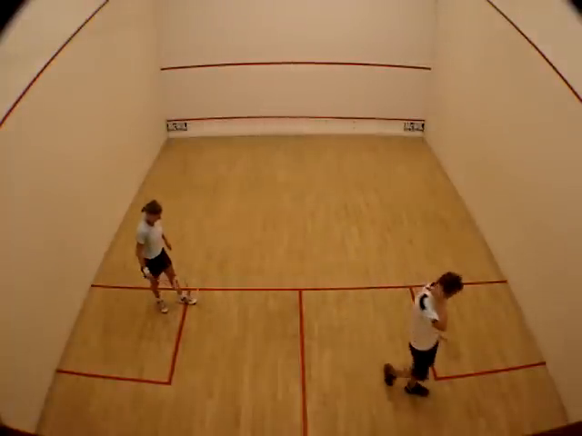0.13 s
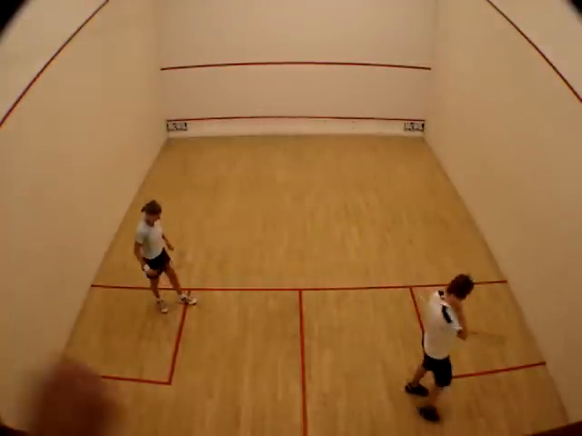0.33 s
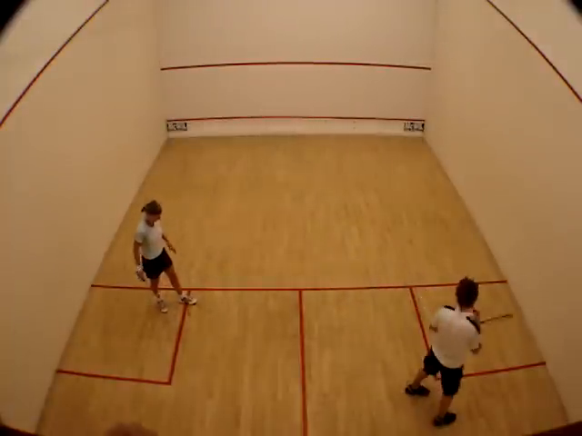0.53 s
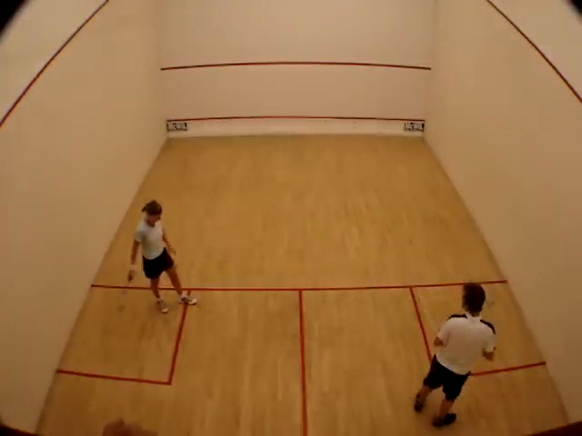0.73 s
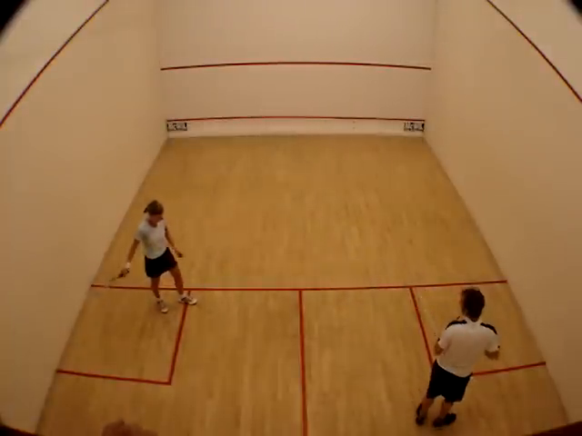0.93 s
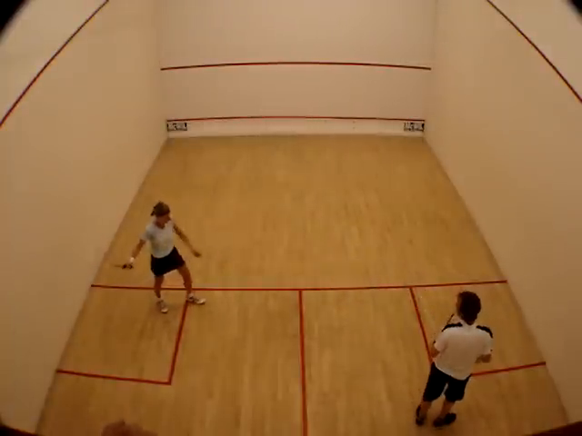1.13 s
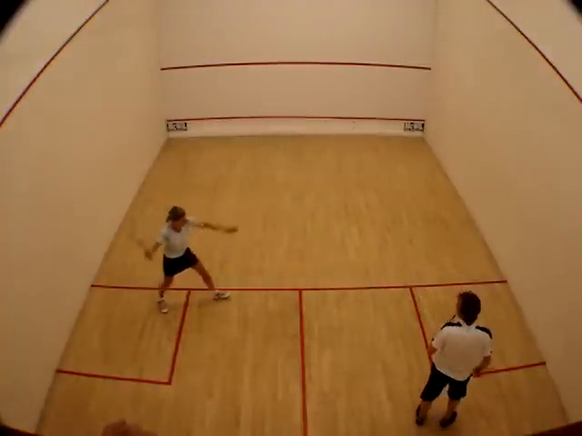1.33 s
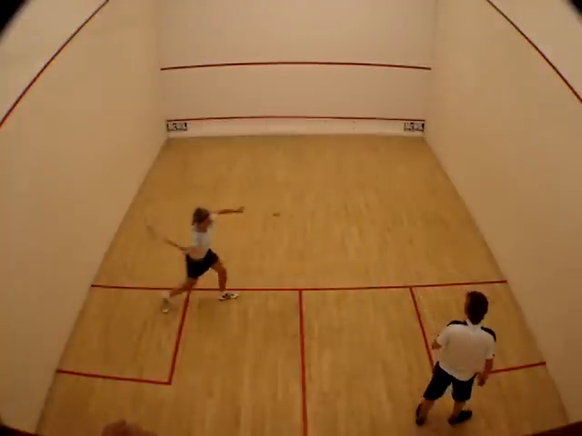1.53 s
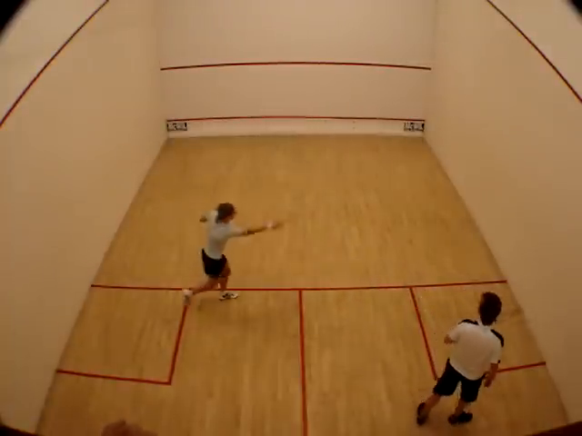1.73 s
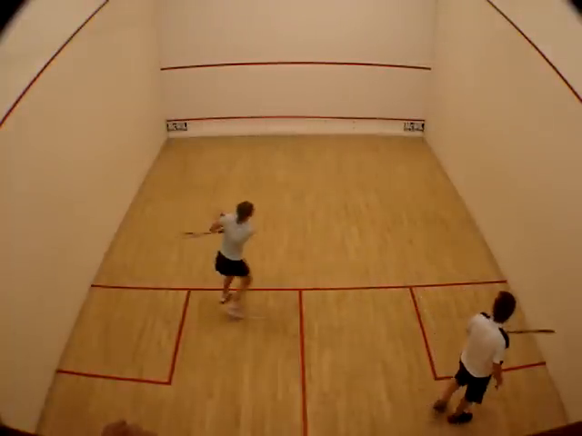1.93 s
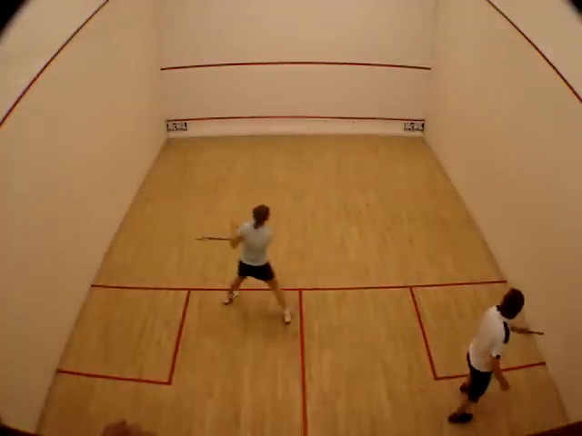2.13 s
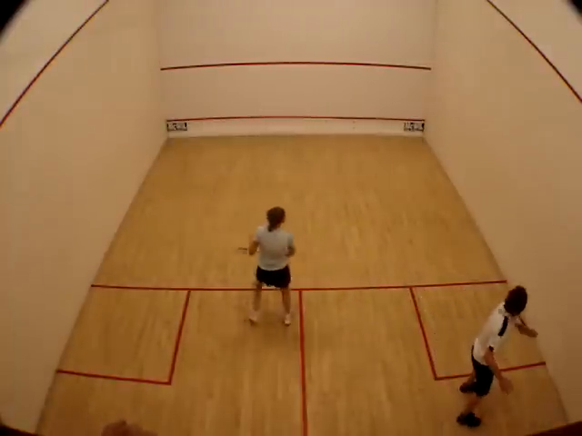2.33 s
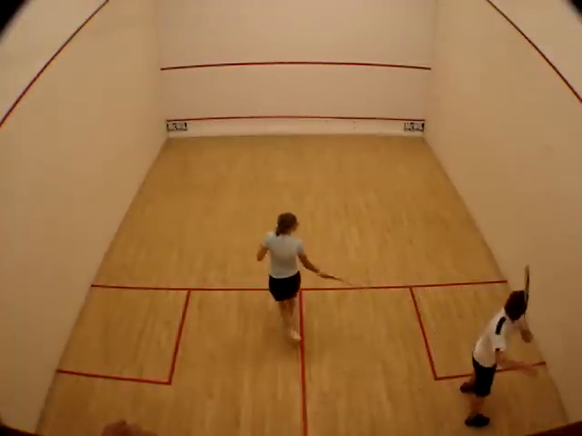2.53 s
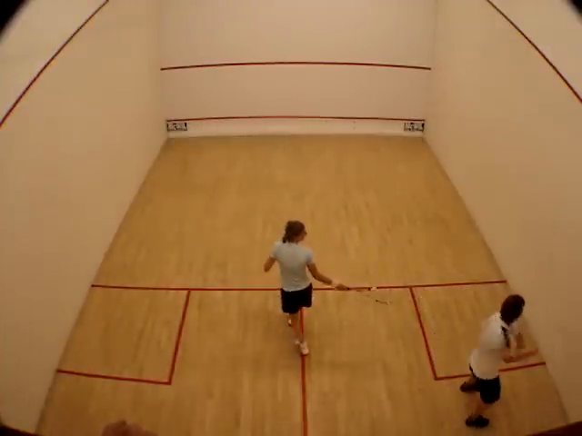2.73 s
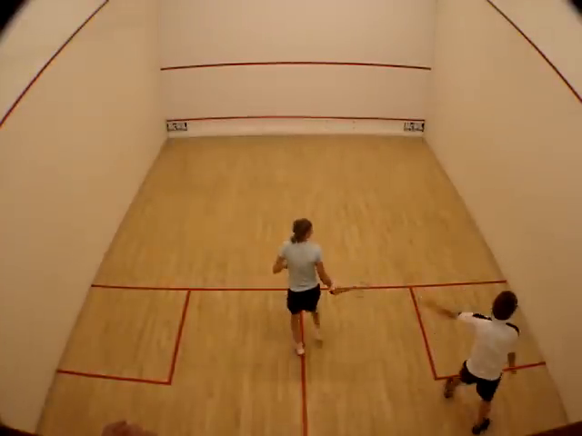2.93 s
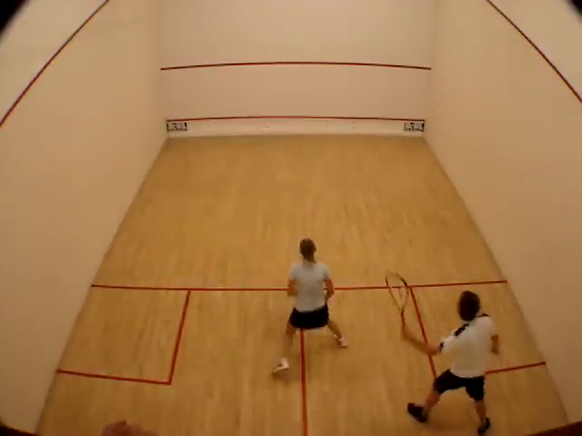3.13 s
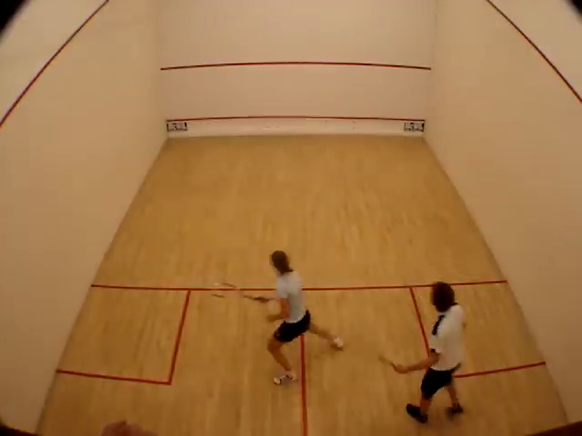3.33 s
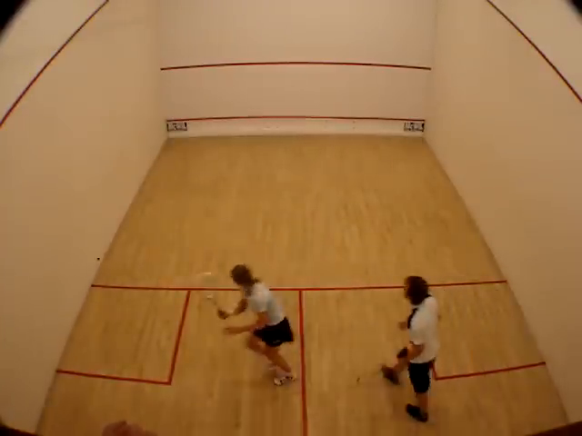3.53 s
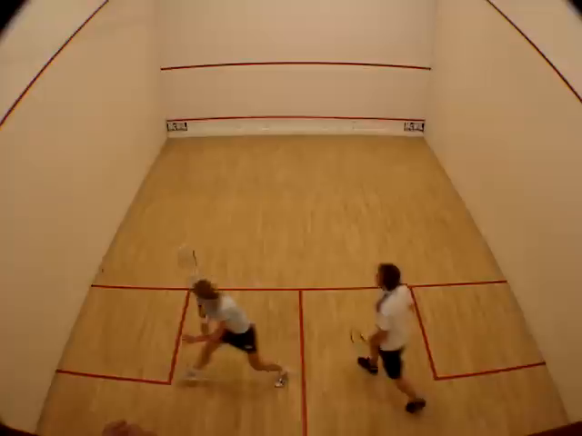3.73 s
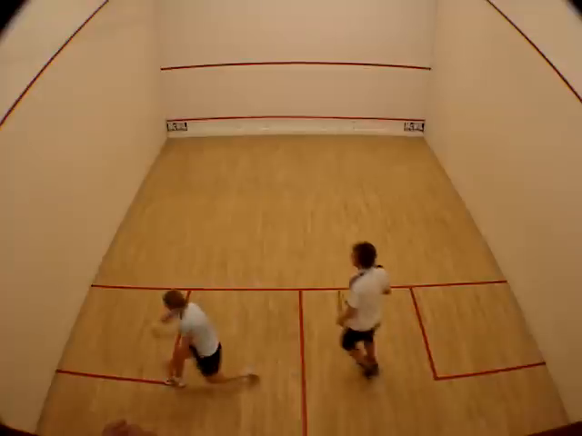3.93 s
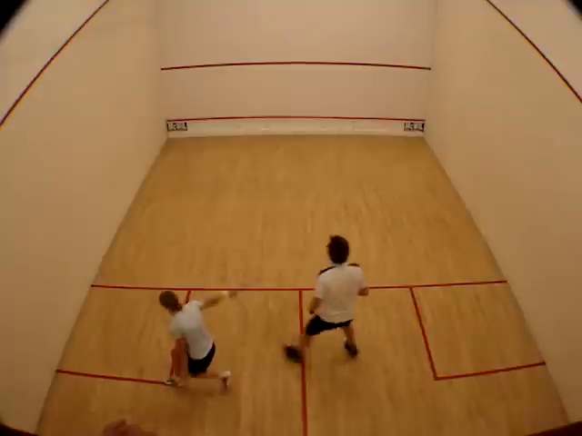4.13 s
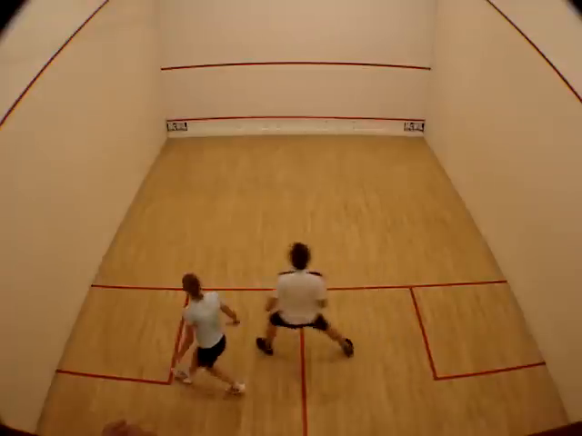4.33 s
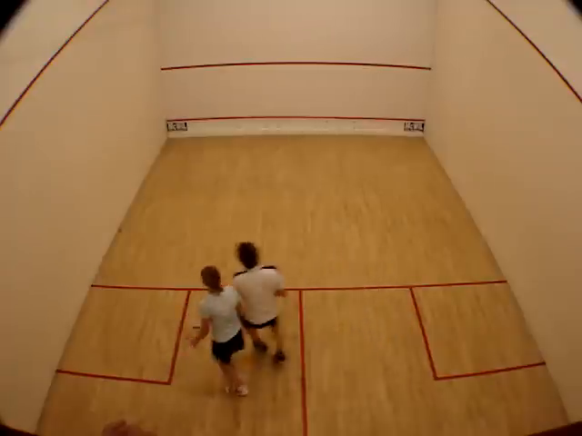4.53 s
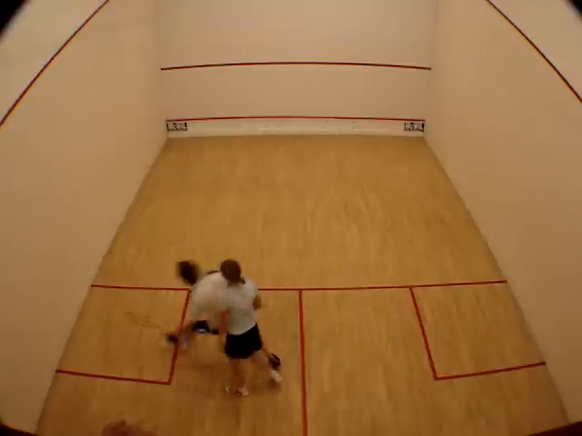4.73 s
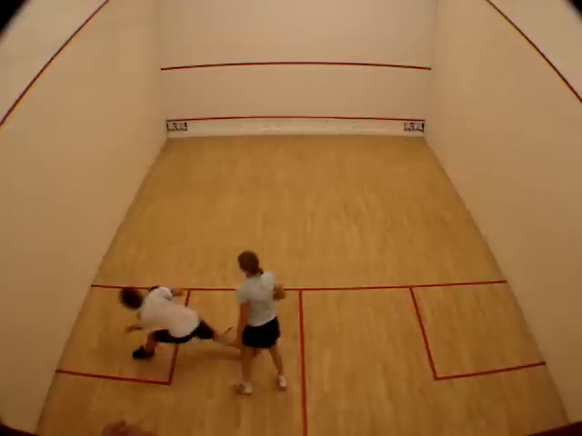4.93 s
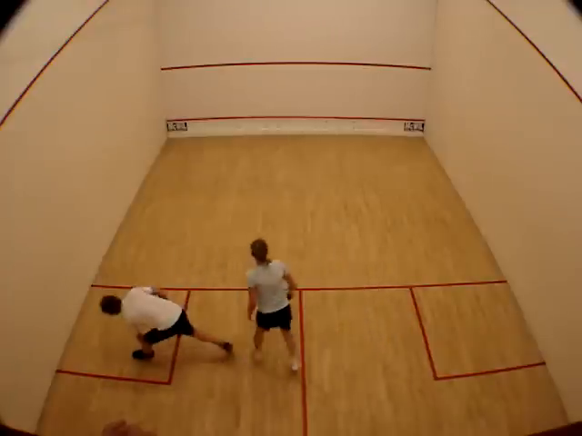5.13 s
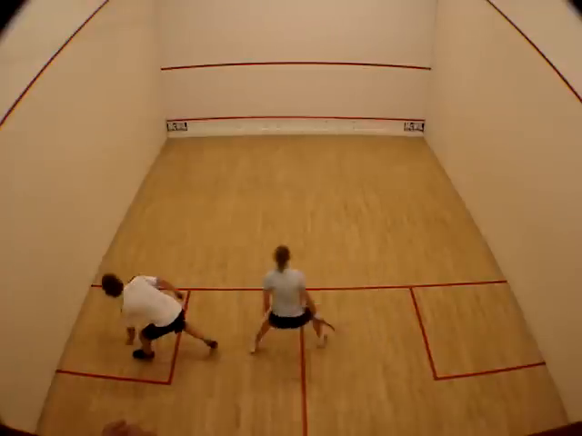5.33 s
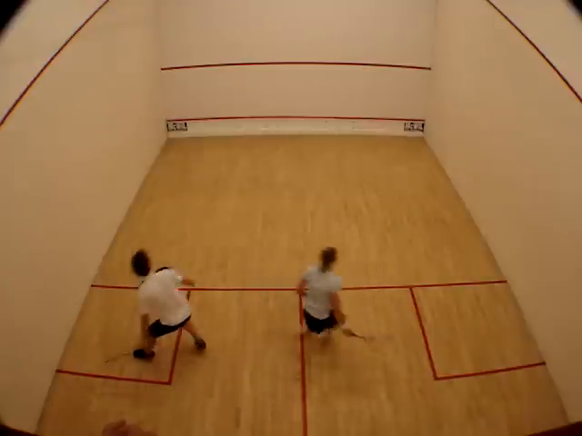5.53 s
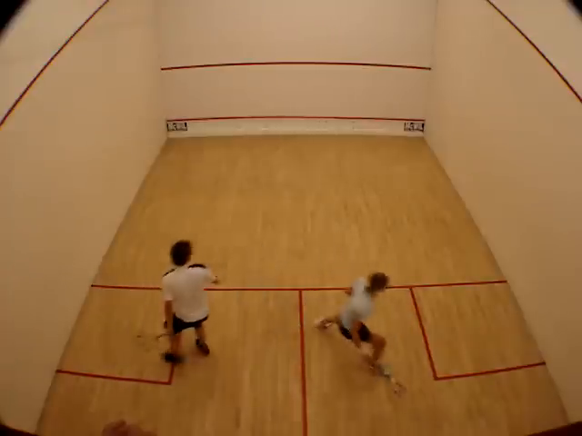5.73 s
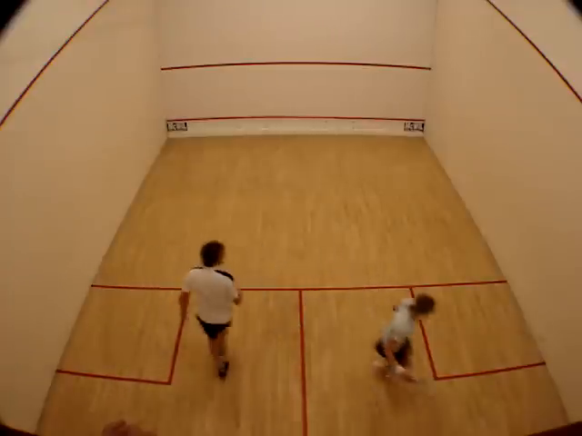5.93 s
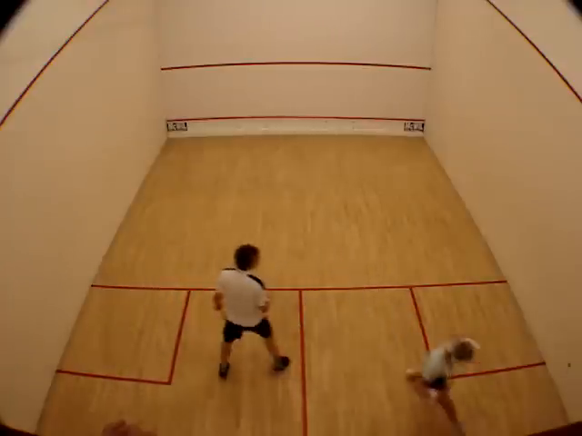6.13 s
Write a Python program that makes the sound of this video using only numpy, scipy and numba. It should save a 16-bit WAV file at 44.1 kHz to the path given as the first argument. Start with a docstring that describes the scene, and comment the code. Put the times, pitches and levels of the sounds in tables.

```python
"""A rubber ball knocks on racket strings and plaster walls in a rally on a bare, very live squash court.
Shoes thud, drag and squeak on the boards, and the court rings on for seconds over the building's murmur.
Short, dull thumps accompany the loudest sounds. A small camera high on the back wall hears it all;
its quick gain control flattens each blow and pulls the ringing back up."""
import sys
import numpy as np
from scipy import signal
from scipy.fft import rfft, irfft
from scipy.io import wavfile
from scipy.ndimage import uniform_filter1d
from numba import njit

SR = 44100
rng = np.random.default_rng(int(sys.argv[2]) if len(sys.argv) > 2 else 0)


def unload_audio(sound):
    """Save the sound as a 16-bit wav file, at the path given as the first command line argument."""
    columns = np.transpose(np.atleast_2d(sound))
    # keep every value between -1 and 1, then stretch to whole-number steps
    steps = np.round(np.clip(columns, -1, 1) * 32767)
    wavfile.write(sys.argv[1], SR, steps.astype(np.int16))


N = 277389


def undb(db):
    """Gain of a level in dB."""
    return 10 ** (np.asarray(db) / 20)


def curve_at(table, hz):
    """Read a curve of (Hz, value) points along a log-frequency axis."""
    freqs, values = np.transpose(table)
    return np.interp(np.log(np.maximum(hz, 1)), np.log(freqs), values)


def add(track, start_s, sound):
    """Mix a sound into the track at its start time."""
    i = max(int(start_s * SR), 0)
    track[i:i + len(sound)] += sound[:len(track) - i]


def knock(colour, pitch, bright_db, tone_hz=1000, tone_db=0, size=2048):
    """One impact: the tightest pulse with this colour, treble tilt and standout tone, at unit energy."""
    hz = np.maximum(np.arange(size // 2 + 1) * SR / size, 30)
    db = curve_at(colour, hz / pitch) + bright_db * np.log2(hz / 1000)
    db += tone_db * np.exp(-.5 * (np.log2(hz / tone_hz) / 0.17) ** 2)  # a bell, 0.17 octaves of spread
    cepstrum = irfft(db * np.log(10) / 20)
    cepstrum[1:size // 2] *= 2  # minimum phase packs the energy into the attack
    cepstrum[size // 2 + 1:] = 0
    pulse = irfft(np.exp(rfft(cepstrum)))
    return pulse / np.sqrt(np.sum(pulse ** 2))


def ball(hits, colour, tone_db, slap_s, slap_db):
    """The ball knocks on a surface, and the facing wall slaps each knock back."""
    knocks = [(start, undb(db) * knock(colour, 0.99, bright_db, tone_hz, tone_db))
              for start, db, bright_db, tone_hz in hits]
    slaps = [(start + slap_s, undb(slap_db) * pulse) for start, pulse in knocks]
    return around_court(knocks) + around_court(slaps)


# Racket strokes. Each row: start in seconds, level in dB, brightness in dB per octave, standout tone in Hz.
RACKET_HITS = [(1.779, -8, 1.36, 404), (2.903, -5, 0.46, 2380), (4.062, -3.5, 1.76, 1860),
               (5.038, -9, -0.8, 2460), (5.18, -6.5, 0.5, 1670)]
# The colour of struck strings. Each row: frequency in Hz, relative level in dB.
STRING_COLOUR = [(60, -38.5), (220, -14), (400, -4.5), (560, -8), (800, 2), (950, -4), (1250, -1),
                 (1600, -8), (2300, -10.5), (2900, -14.5), (3600, -10), (5000, -18.5), (7200, -24),
                 (10000, -36)]


def racket():
    """The strings meet the ball with a hollow, midrange pock."""
    return ball(RACKET_HITS, STRING_COLOUR, tone_db=6.5, slap_s=0.033, slap_db=-4)


# Wall hits. Each row: start in seconds, level in dB, brightness in dB per octave, standout tone in Hz.
WALL_HITS = [(.613, -25.5, 2.1, 3430), (2.001, -3, 0.5, 1204), (3.078, 1.5, 0.75, 1586),
             (3.184, -3.5, 0.22, 860), (4.216, -0.5, 1.1, 793), (4.305, 0.5, .3, 2130),
             (5.227, 0.5, 0.62, 1300)]
# The colour of struck plaster. Each row: frequency in Hz, relative level in dB.
PLASTER_COLOUR = [(60, -50.5), (250, -6), (600, -6), (900, 0.5), (1300, -2.5), (1700, -0.5), (2300, -6),
                  (4100, -11.5), (7000, -21.5), (10000, -25.5)]


def walls():
    """The ball cracks against hard plaster."""
    return ball(WALL_HITS, PLASTER_COLOUR, tone_db=4.5, slap_s=0.049, slap_db=-6.5)


def squeak(length_s, first_hz, last_hz, overtone_db, hiss_db):
    """Stick-slip: a gliding slip rate, overtones from the sharp catch and a rubbing hiss, at unit energy."""
    progress = np.arange(int(length_s * SR)) / (length_s * SR)
    waver, grit = rng.standard_normal((2, 16384))[:, :len(progress)]
    waver = uniform_filter1d(waver, size=6) * np.sqrt(6)
    slip_hz = (first_hz + (last_hz - first_hz) * progress) * (1 + 0.05 * waver)
    phase = 2 * np.pi * np.cumsum(slip_hz) / SR
    tone = np.sin(phase) + undb(overtone_db) * np.sin(2 * phase)
    tone += undb(overtone_db - 16.5) * np.sin(3 * phase)
    hiss = signal.sosfilt(signal.butter(2, (2960, 7000), "band", fs=SR, output="sos"), grit)
    envelope = np.sin(np.pi * progress ** 0.96) ** 0.26
    chirp = (tone + undb(hiss_db) * hiss) * envelope
    return chirp / np.sqrt(np.sum(chirp ** 2))


# Slipping soles. Each row: start and length in seconds, first and last pitch in Hz, level in dB,
# then overtone and hiss in dB against the fundamental.
SQUEAKS = [(0.077, 0.015, 4270, 3950, -30, -8, -6), (0.691, 0.021, 5320, 4370, -24.5, -13, -14),
           (2.165, 0.025, 2720, 2475, -7, -1, -9.5), (2.194, 0.025, 3430, 2970, -9, -18, -5),
           (4.376, 0.023, 3310, 3045, -14.5, -24, -16), (5.43, 0.094, 3924, 4080, -13, -22, -21),
           (5.633, 0.014, 3597, 2880, -3, -11.5, -19), (5.639, 0.019, 3207, 4295, -5, -12, -8.5),
           (6.053, 0.017, 3133, 2724, -2, -10.5, -3.5), (6.066, 0.012, 2230, 2730, -4.5, -8.5, -7),
           (6.08, .015, 2940, 4070, -7, -28, -9)]


def shoe_squeaks():
    """Rubber soles chirp on the varnished boards, now here, now there."""
    chirps = [(start, undb(db) * squeak(length_s, first_hz, last_hz, overtone_db, hiss_db))
              for start, length_s, first_hz, last_hz, db, overtone_db, hiss_db in SQUEAKS]
    return around_court(chirps, decay_scale=0.9)


# Footwork. Each row: start in seconds, level in dB, brightness in dB per octave.
FOOTFALLS = [(.003, -14.5, 1.1), (.1, -21.5, 3), (.218, -19.5, 2), (.29, -10, 2), (.394, -24.5, 3.7),
             (0.611, -15, 2.5), (.684, -20.5, -0.1), (1.497, -14.5, -0.55), (1.702, -32, 1.5),
             (4.919, -24, -0.8), (5.194, -13, 0.6)]
# The colour of the floorboards. Each row: frequency in Hz, relative level in dB.
BOARD_COLOUR = [(50, -30), (105, -15), (140, 0.5), (320, -6.5), (400, -12), (690, -11.5), (1150, -12),
                (1900, -17.5), (3500, -22), (6000, -33.5), (10000, -48.5)]
STEP_DECAY_SCALE = 0.91  # steps ring for this share of the court's decay time


def footsteps():
    """Shoes thud on the boards; the lighter the step, the higher it sounds."""
    firm_db, octaves_per_db = -12, 0.07
    steps = []
    for start, db, bright_db in FOOTFALLS:
        pitch = 2 ** (octaves_per_db * (firm_db - db))
        steps.append((start, undb(db) * knock(BOARD_COLOUR, pitch, bright_db)))
    return around_court(steps, STEP_DECAY_SCALE)


def sole_drag(start_s=1.01, length_s=0.27):
    """A dragged sole: dense grit swells and fades, coloured by the boards and a rough squeal."""
    progress = np.arange(int(length_s * SR)) / (length_s * SR)
    grit = rng.standard_normal(SR)[:len(progress)] * np.sin(np.pi * progress) * np.sqrt(2 / len(progress))
    boards = knock(BOARD_COLOUR, pitch=1.7, bright_db=2.5, tone_hz=3700, tone_db=9)
    track = np.zeros(N)
    add(track, start_s, undb(-22) * signal.fftconvolve(grit, boards))
    return court(track, STEP_DECAY_SCALE)


# Low thumps just ahead of hard ball hits and along with the loudest squeaks.
# Each row: start in seconds, peak level in dB.
THUMPS = [(1.774, -39), (1.992, -23.5), (3.068, -18.5), (4.213, -19.5), (5.221, -16), (5.65, -23),
          (6.058, -23), (6.11, -27)]


def thumps(width_s=0.033):
    """Short, dull low thumps that do not ring on accompany the loudest sounds."""
    widths = np.arange(SR // 10) / (width_s * SR)
    dip = -np.e * 4 * widths * np.exp(-4 * widths)
    track = np.zeros(N)
    for start, db in THUMPS:
        add(track, start, undb(db) * dip)
    return track


# The court's reverb tail. Each row: frequency in Hz, time to fall by 60 dB in seconds.
COURT_T60 = [(40, 0.5), (150, 1.45), (400, 2.7), (700, 3.16), (870, 2.66), (1100, 2.66), (2000, 2.34),
             (3500, 1.86), (5500, 1.61), (8000, 1.13), (11000, 0.6)]
# The direct path and strong wall echoes. Each row: delay in seconds, level in dB over the tail.
ECHOES = [(0., 1), (.003, -2), (0.009, -0.5), (0.02, 0.5), (0.035, -19.5), (0.06, 1.5)]


def court(dry, decay_scale):
    """The court's answer from one spot: strong echoes over a dense tail that rings longest in the mids."""
    build_s, smear_s = 0.026, 0.0031  # reflections thicken; rough surfaces smear each echo
    hz, frame_s, spectrum = signal.stft(rng.standard_normal(2 * SR), SR, nperseg=512)
    t60 = decay_scale * curve_at(COURT_T60, hz)[:, None]
    tail = signal.istft(spectrum * undb(-60 * frame_s / t60), SR)[1]
    t = np.arange(len(tail)) / SR
    envelope = 1 - np.exp(-t / build_s)
    for delay, db in ECHOES:
        envelope += (t >= delay) * undb(db) * np.exp(-np.abs(t - delay) / smear_s)
    return signal.fftconvolve(dry, tail * envelope)[:N]


def around_court(events, decay_scale=1):
    """Sounds alternate between two spots, each with its own reverb."""
    spots = np.zeros((2, N))
    for k, (start, sound) in enumerate(events):
        add(spots[k % 2], start, sound)
    return sum(court(spot, decay_scale) for spot in spots)


# The colour of the room tone. Each row: frequency in Hz, relative level in dB.
MURMUR_COLOUR = [(40, -18.5), (70, -9), (85, -9), (102, -11.5), (150, -8), (400, -5.5), (1000, -17),
                 (2500, 1), (5000, -13), (10000, -31.5)]


def building_murmur():
    """Air handling and far courts blur into a steady bed of noise."""
    colour = undb(curve_at(MURMUR_COLOUR, np.fft.rfftfreq(N + 1, 1 / SR)))
    noise = irfft(rfft(rng.standard_normal(N + 1)) * colour)[:N]
    return undb(-32.5) * noise / np.std(noise)


def scene():
    """Ball, thumps, feet and building, mixed in mono."""
    rally = racket() + walls() + thumps()
    return (rally + footsteps() + sole_drag() + shoe_squeaks() + building_murmur())[None]


@njit
def gain_control(x, sidechain, knee, ratio, attack_s, release_s):
    """A compressor follows the peaks, quick up and slow down, and ducks the sound over a soft knee."""
    ducked, envelope = np.empty(len(x)), knee
    for i in range(len(x)):
        level = abs(sidechain[i])
        envelope += (level - envelope) / (SR * (attack_s if level > envelope else release_s))
        ducked[i] = x[i] * (knee / (knee + envelope)) ** (1 - 1 / ratio)
    return ducked


def record(dry):
    """The camera's chain: gain control, rounded and lopsided peaks, a bass cut and a steep top cut."""
    sub_bass = signal.sosfilt(signal.butter(2, 45, fs=SR, output="sos"), dry[0])
    sidechain = dry[0] + undb(21) * sub_bass  # the level sensor is keenest on the deepest bass
    x = gain_control(dry[0], sidechain, knee=float(undb(-15.5)), ratio=6.5, attack_s=0.0011, release_s=0.17)
    x = 0.74 * np.tanh(x * undb(3.0) / 0.65)
    x = x - 0.092 * x ** 2  # the amplifier swings further down than up
    x = signal.sosfilt(signal.butter(1, 23, "high", fs=SR, output="sos"), x)
    return signal.sosfilt(signal.ellip(14, .3, 75, 10080, fs=SR, output="sos"), x)[None]


dry = scene()
out = record(dry)
unload_audio(out)
```